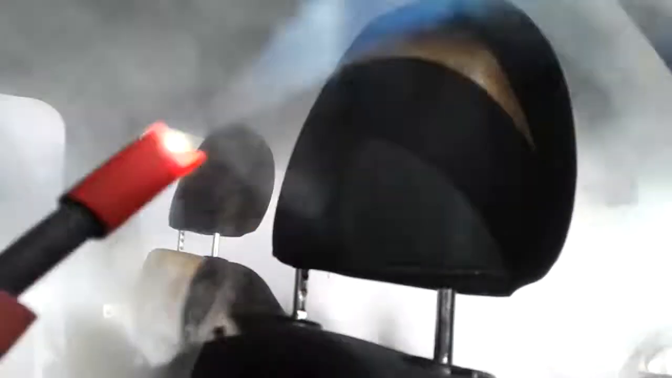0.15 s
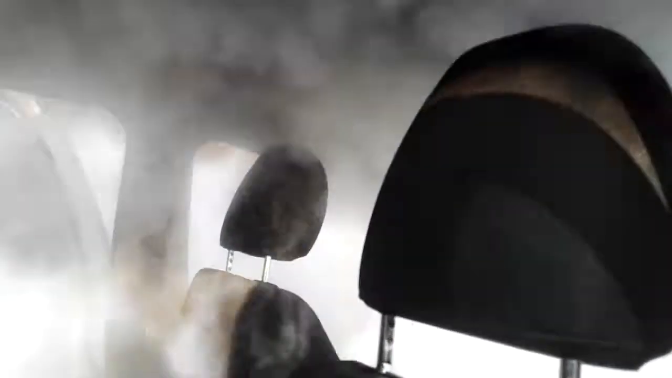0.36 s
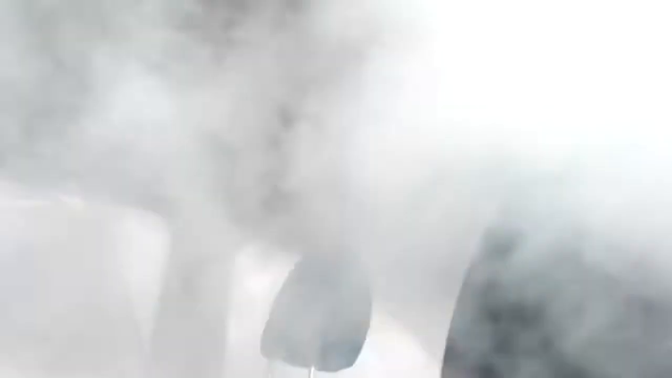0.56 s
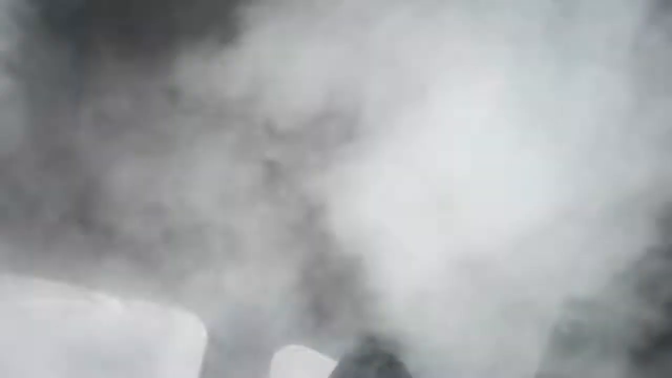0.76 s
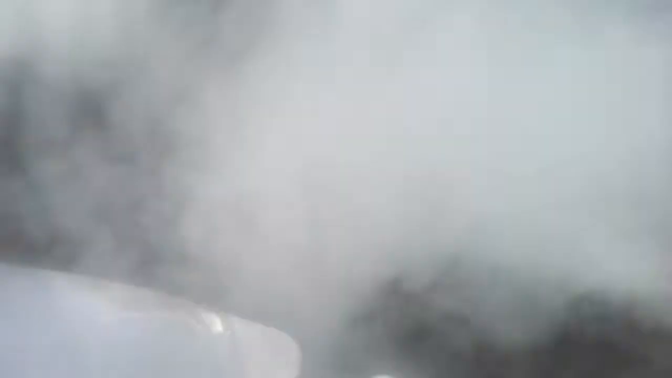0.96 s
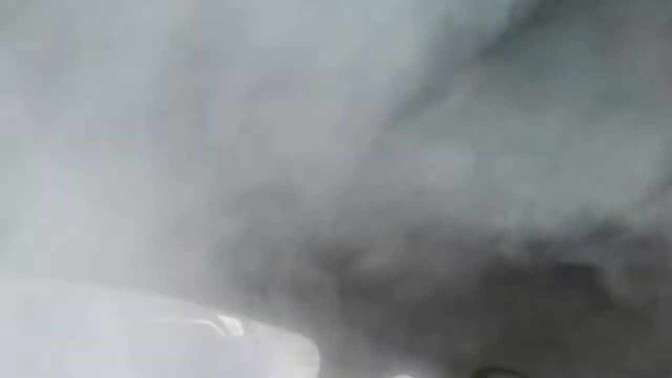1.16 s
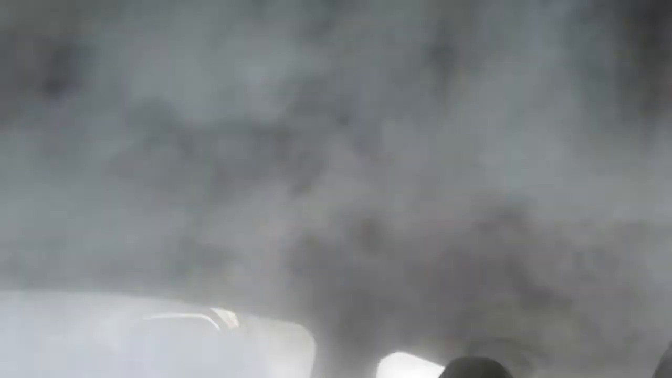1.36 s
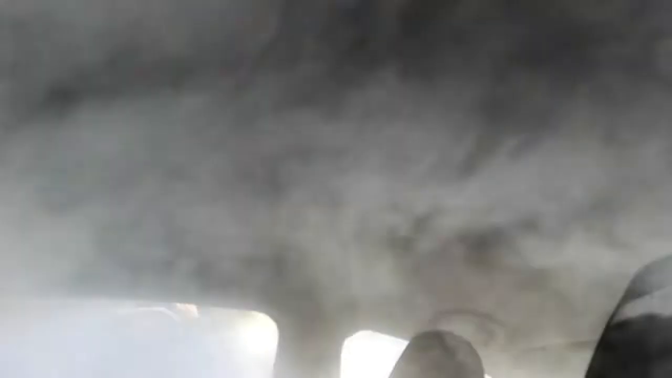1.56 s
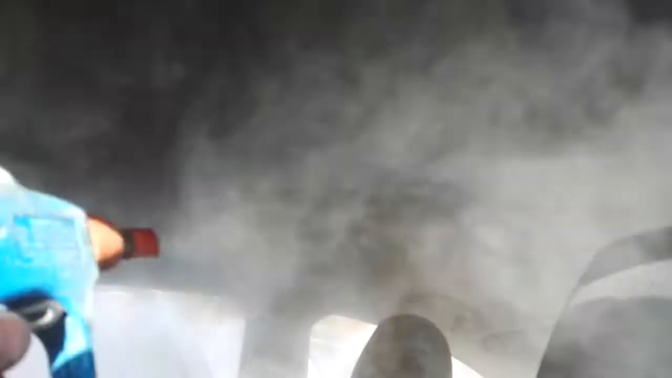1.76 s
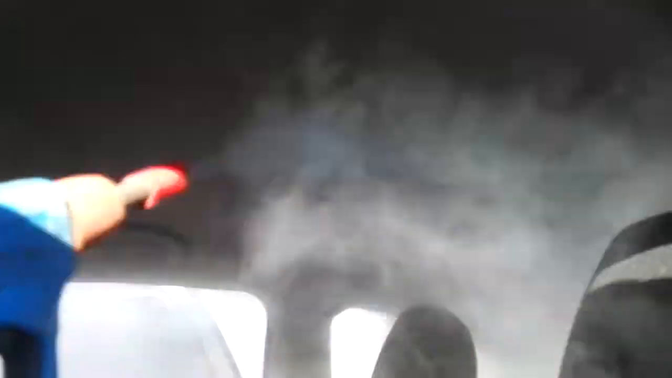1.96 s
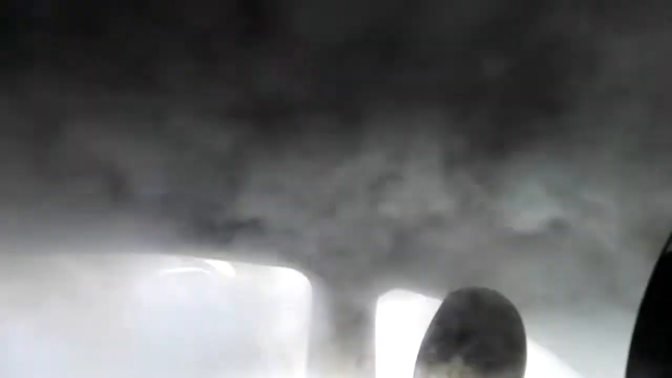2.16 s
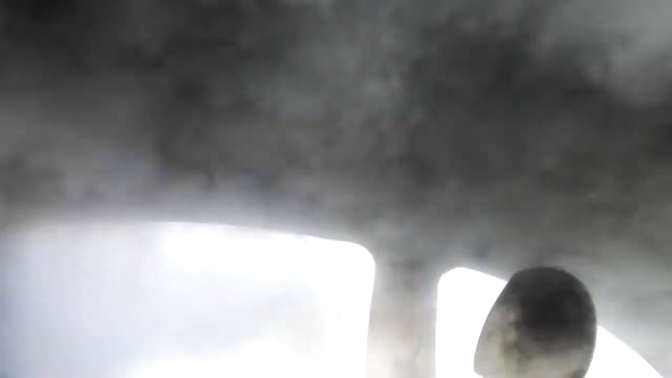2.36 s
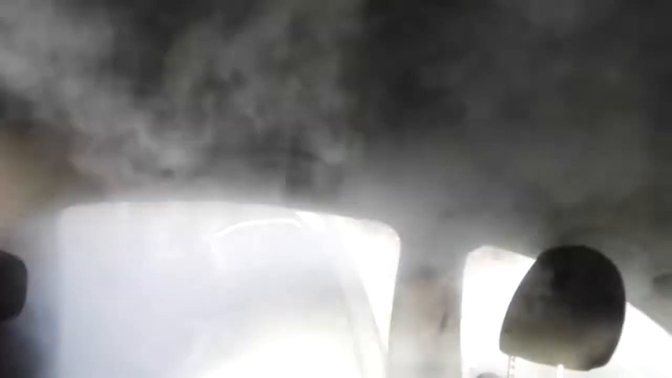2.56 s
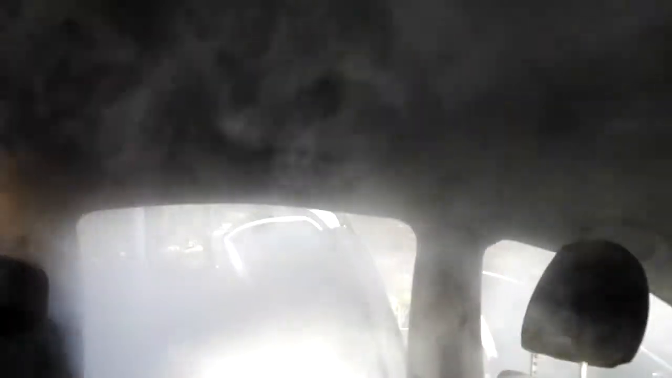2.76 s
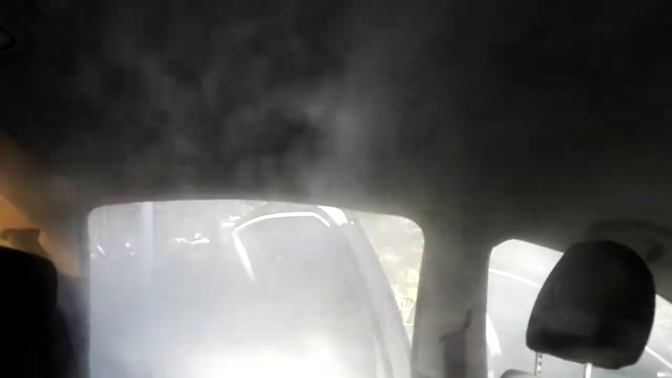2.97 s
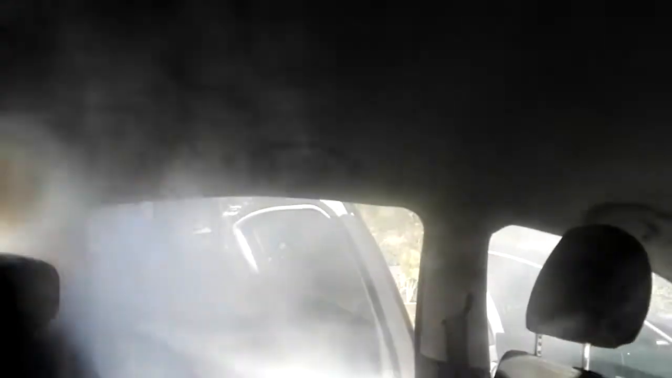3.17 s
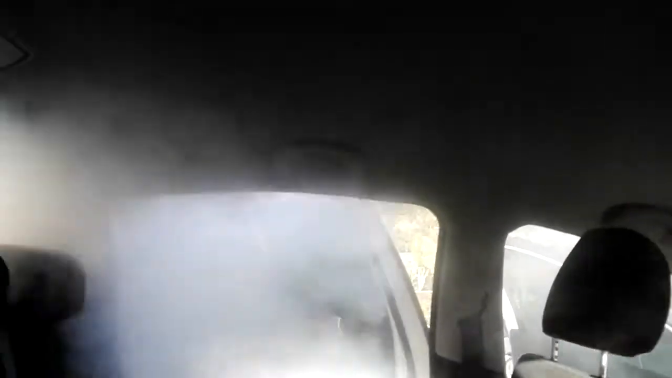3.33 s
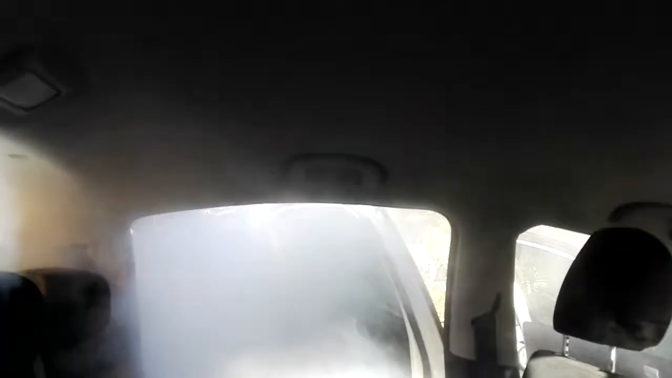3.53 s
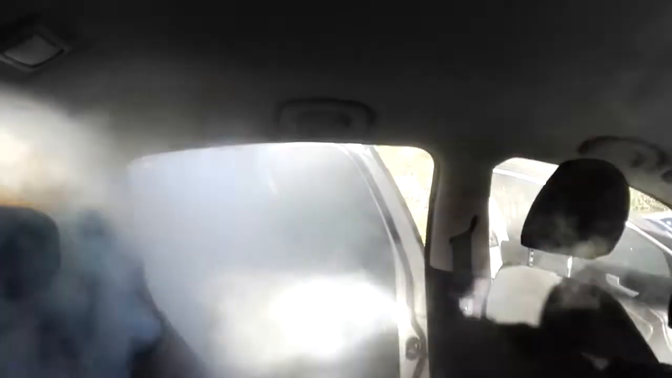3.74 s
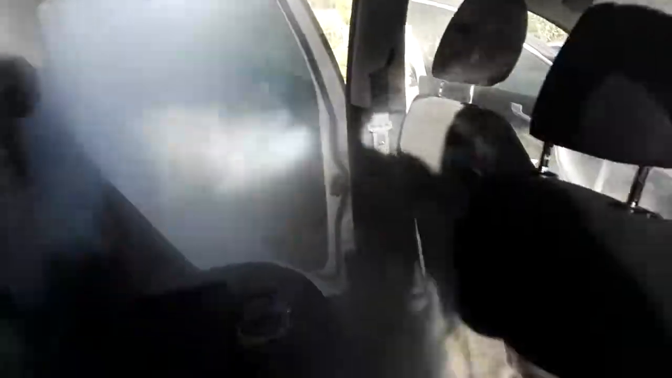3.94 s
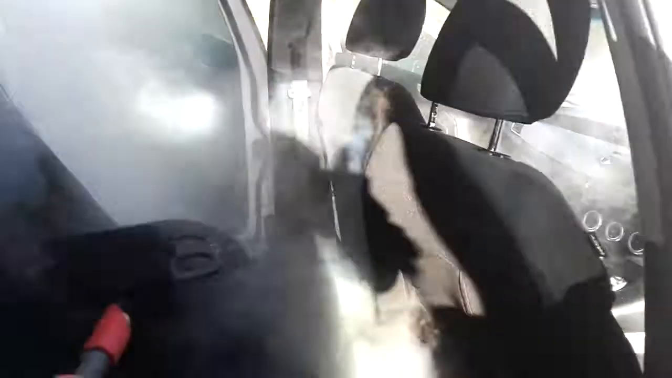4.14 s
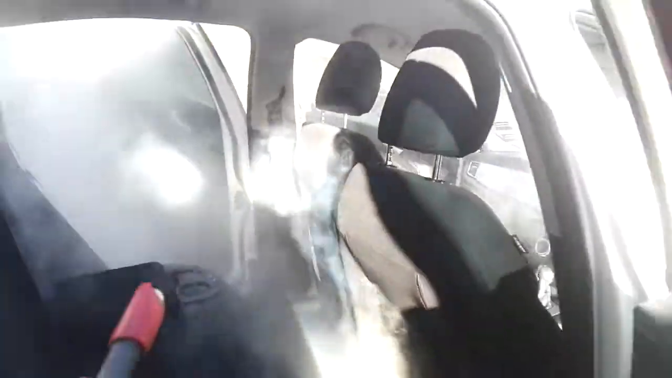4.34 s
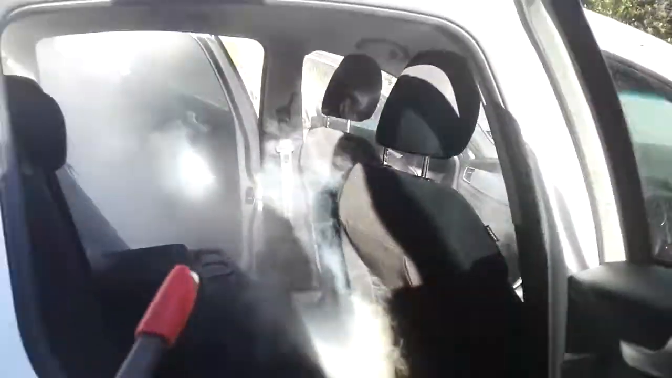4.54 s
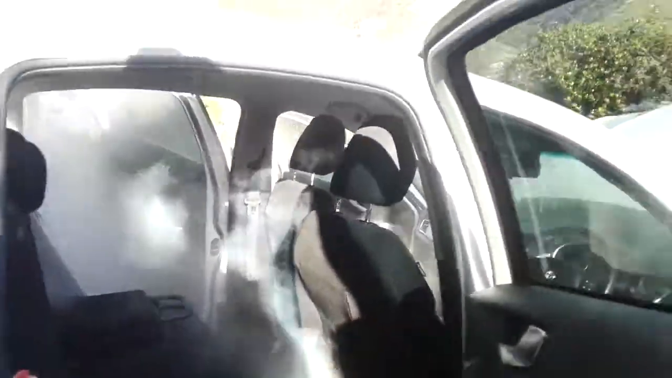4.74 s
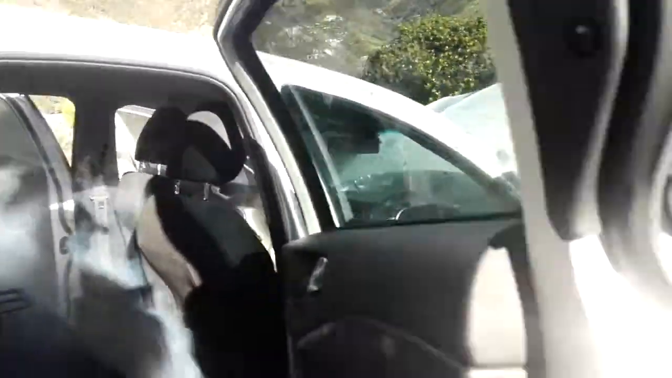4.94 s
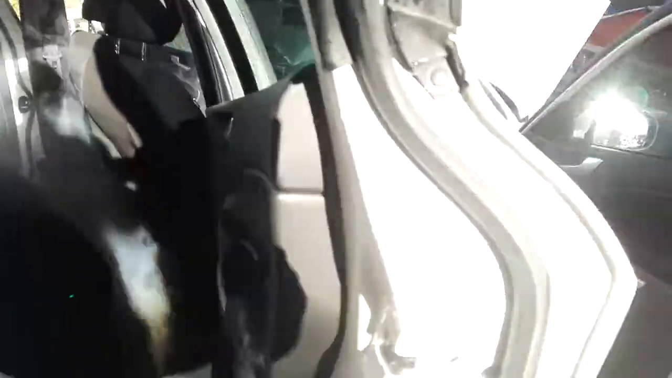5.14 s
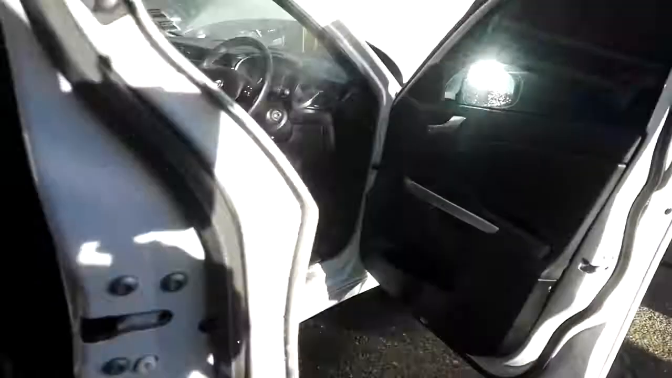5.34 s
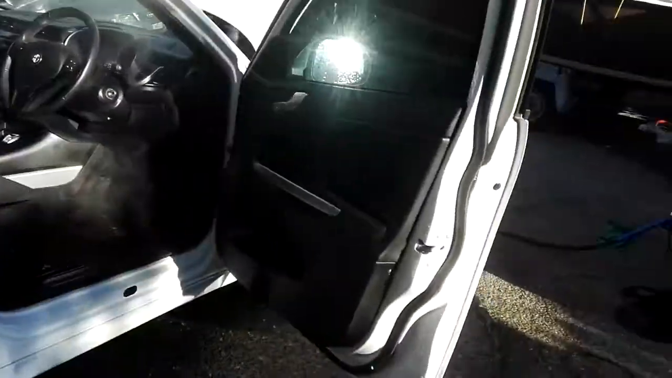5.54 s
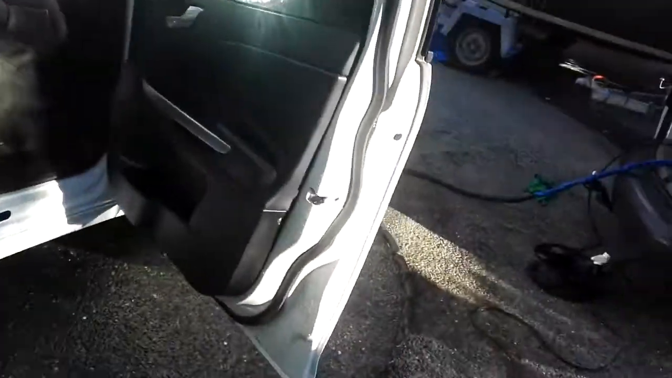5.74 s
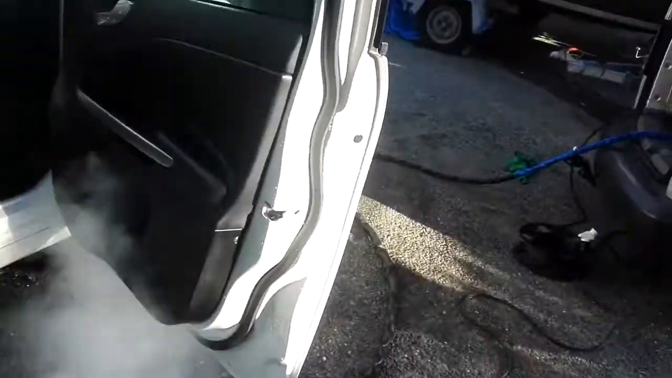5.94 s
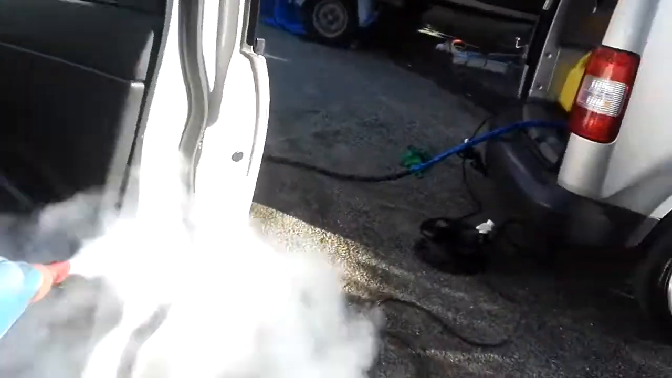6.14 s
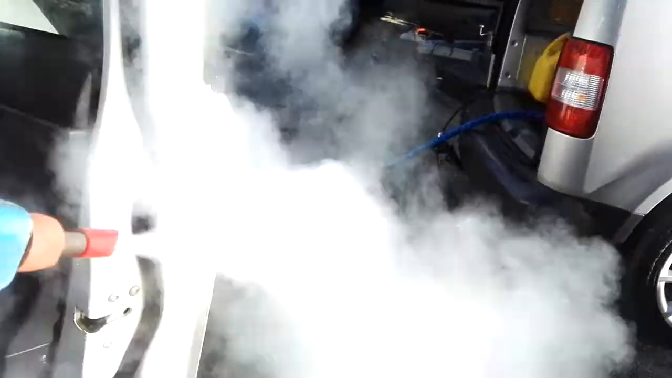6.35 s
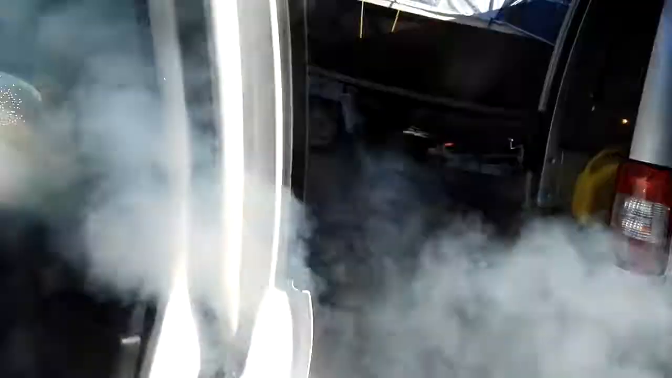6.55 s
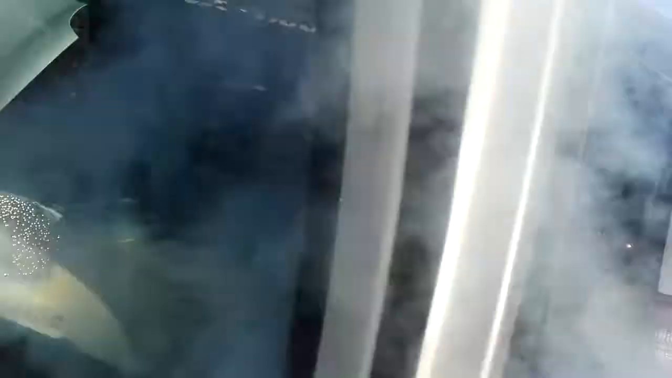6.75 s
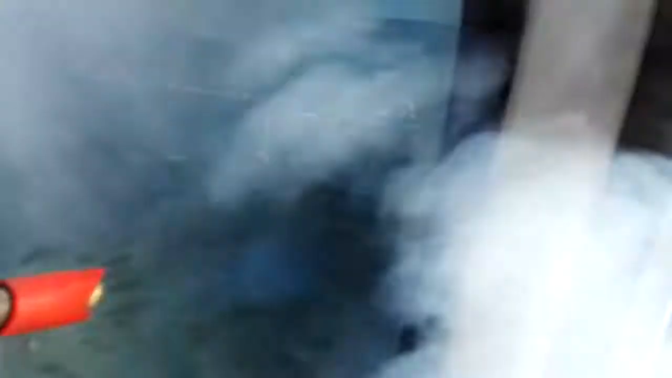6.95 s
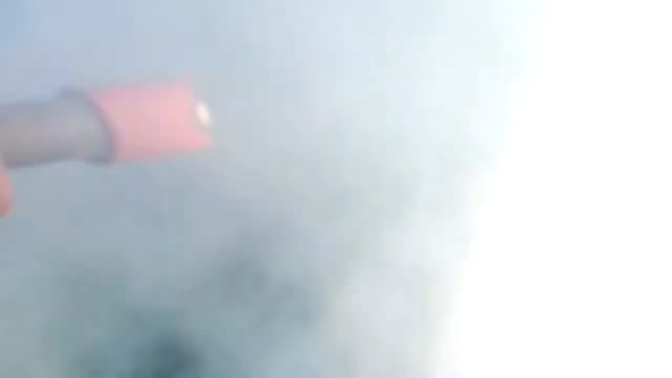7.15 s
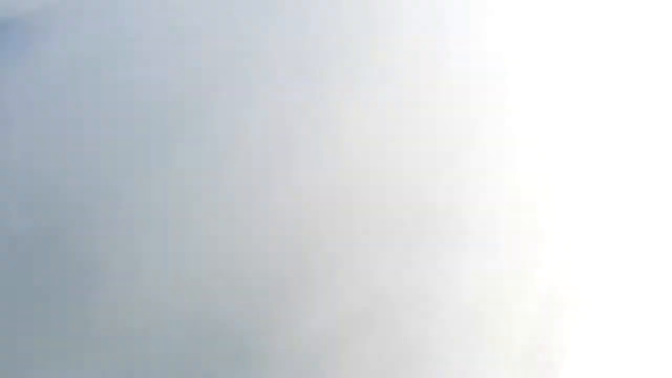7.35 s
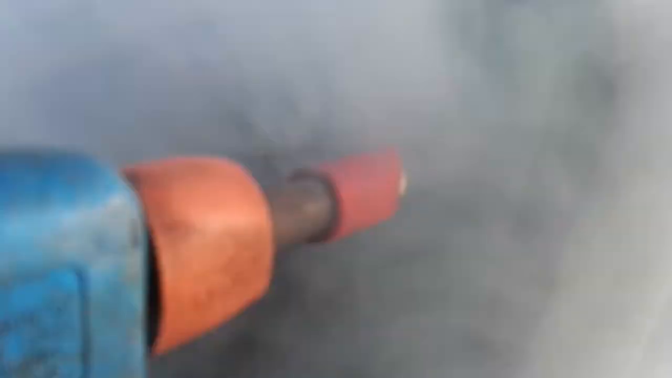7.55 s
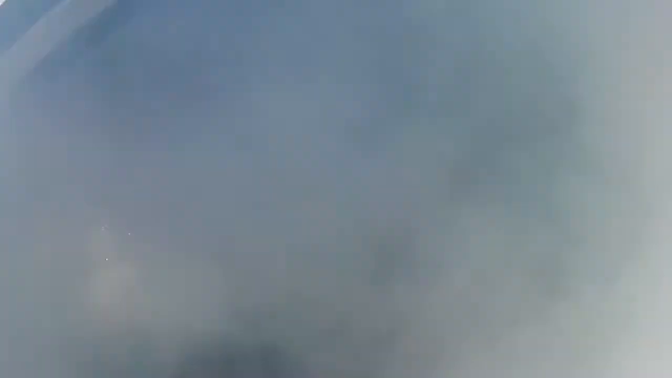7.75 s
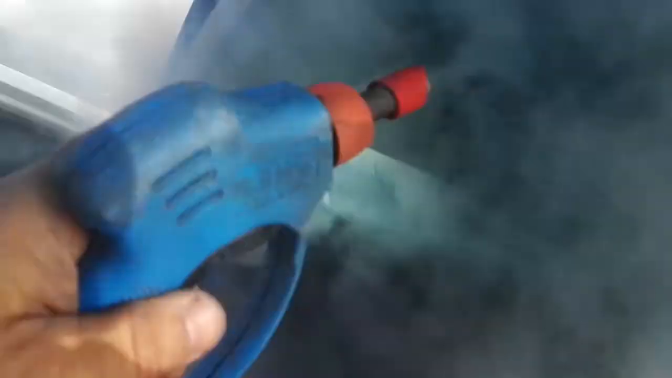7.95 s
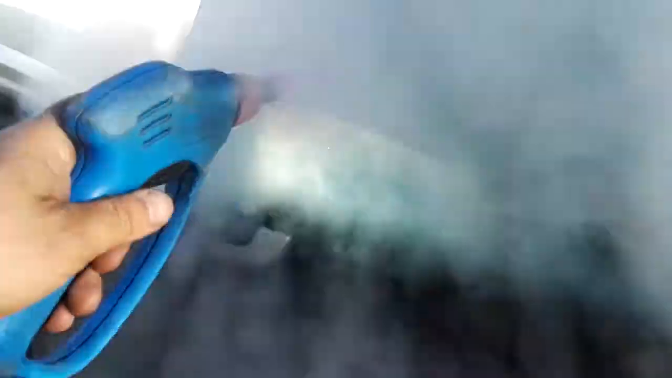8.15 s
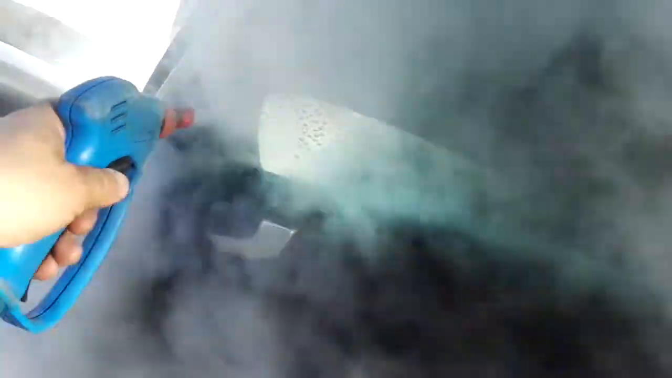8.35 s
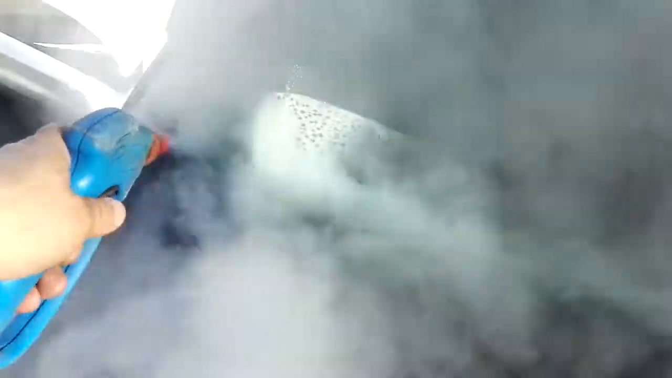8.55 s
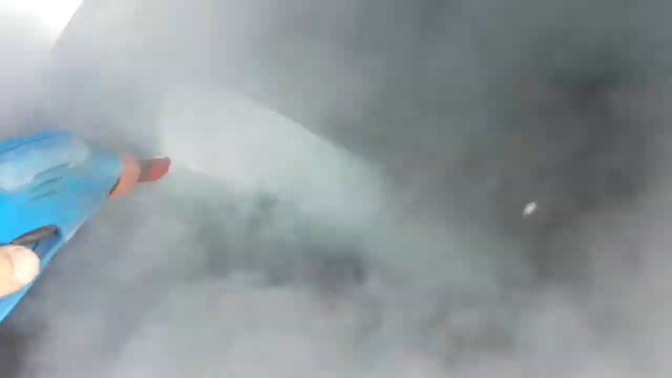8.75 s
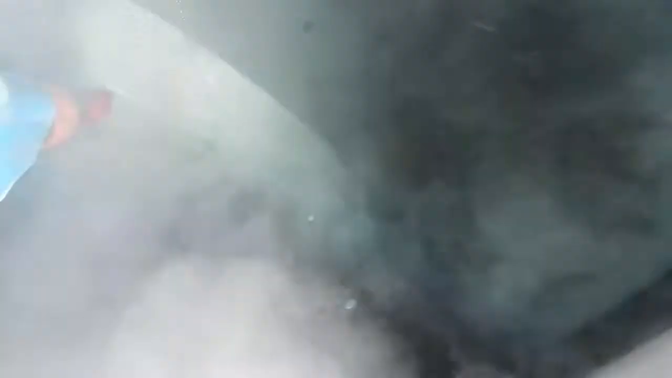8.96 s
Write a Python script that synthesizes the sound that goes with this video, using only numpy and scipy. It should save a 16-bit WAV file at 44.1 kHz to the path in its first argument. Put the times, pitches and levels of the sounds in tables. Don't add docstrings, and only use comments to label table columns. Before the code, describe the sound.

Very close in a car cabin, a steam jet roars and hisses, overloading the microphone at first, then thinning to steadier bright hiss. It cuts off suddenly; a trigger tick, a few bouncing plastic knocks, dull thumps and faint simmering follow over low breeze. A second long jet bursts in and roars to the end.

```python
import sys
import numpy as np
from scipy import signal
from scipy.fft import rfft, irfft, next_fast_len
from scipy.io import wavfile
from scipy.ndimage import uniform_filter1d, map_coordinates

SR = 44100
rng = np.random.default_rng(int(sys.argv[2]) if len(sys.argv) > 2 else 0)


def amplitude_ratio(level_db):
    exponent = np.asarray(level_db, float) / 20
    return 10 ** exponent


def transcribe(u):
    v = np.clip(np.atleast_2d(u).T, -1, 1)
    q = np.round(v * 32767).astype(np.int16)
    wavfile.write(sys.argv[1], SR, q)


N = 401310
SLOW = np.arange(0, N, 64) / SR
SHUTS = 3.8

# pitch_hz [Hz], level_db [dB]
SHADE = [(60, 0), (200, -.8), (600, -6), (1500, -11), (4000, -13)]


def unit(x):
    return x / np.sqrt(np.mean(x ** 2) + 1e-20)


def along(points, hz):
    f, v = np.transpose(points)
    return np.interp(np.log(hz + 1), np.log(f + 1), v)


def curves(rows):
    s, *columns = np.transpose(rows)
    return [np.interp(SLOW, s, column) for column in columns]


def fine(*controls):
    return [np.interp(np.arange(N) / SR, SLOW, control) for control in controls]


def wobble(rate):
    knots = rng.standard_normal(int(N * rate / SR) + 4)
    return map_coordinates(knots, [np.arange(N) * rate / SR])


def filtered(x, response):
    m = next_fast_len(N + 8192)
    return irfft(rfft(x, m) * response(np.fft.rfftfreq(m, 1 / SR)), m)[..., :N]


def colour(spectrum):
    below = (spectrum[0][0] / 4, -90)
    above = (spectrum[-1][0] * 4, -90)
    points = [below] + list(spectrum) + [above]
    return lambda hz: amplitude_ratio(along(points, hz))


def summed(*db):
    return 10 * np.log10(sum(amplitude_ratio(2 * d) for d in db))


def swells(rows, rest_db=-120):
    comes, goes = 230, 200
    start, length, db = np.transpose(rows)[..., None]
    early = np.maximum(start - SLOW, 0)
    late = np.maximum(SLOW - start - length, 0)
    return summed(*(db - comes * early - goes * late), rest_db)


def eddies(patchy_db):
    z = signal.stft(rng.standard_normal((2, N)), nperseg=512)[2]
    field = uniform_filter1d(rng.standard_normal(z.shape), 6, 1)
    field = uniform_filter1d(field, 8, 2)
    return unit(signal.istft(z * amplitude_ratio(patchy_db * unit(field)), nperseg=512)[1][:, :N])


def near_mono(spectrum):
    middle_and_side = unit(filtered(rng.standard_normal((2, N)), colour(spectrum)))
    return np.array([[1, .25], [1, -.25]]) @ middle_and_side


def surroundings():
    # pitch_hz [Hz], level_db [dB per Hz]
    breeze_colour = [(20, -16), (50, -3), (85, 0), (115, -7), (200, -22), (500, -40)]
    drone_colour = [(200, -25), (290, -4.5), (330, -0.5), (380, -12), (520, -22)]
    yard_colour = [(400, -8), (650, -5), (870, 0), (1200, -3.5), (1700, -9), (2500, -7), (3200, -14.5)]
    # pitch_hz [Hz], level_db [dB per Hz]
    simmer_colours = [
        [(2800, -13), (4500, -4), (5500, 1), (8000, -7.5), (11000, -18), (14500, -20)],
        [(2800, -10.5), (5000, 1), (7000, -5), (9500, -0.5), (11500, -3.5), (14500, -5.5)],
    ]
    # start_s [s], length_s [s], level_db [dB]
    breeze_on = [(3.8, 1.13, -64.5), (3.8, 0.46, -72), (4.97, .2, -70), (5.17, 0.12, -63)]
    drone_on = [(4.36, .1, -79), (4.6, .4, -86), (5.02, 0.447, -80.5), (5.5, .36, -83)]
    yard_on = [(4.33, 1.11, -81.5), (4.52, 0.11, -82), (4.9, .3, -80.5)]
    simmer_on = [(4.385, 1.03, -67.5), (4.68, .05, -71), (4.95, .3, -69.5)]

    breeze_db, drone_db = fine(swells(breeze_on, rest_db=-89), swells(drone_on, rest_db=-90))
    yard_db, simmer_db = fine(swells(yard_on, rest_db=-91.5), swells(simmer_on, rest_db=-83))
    breeze = amplitude_ratio(breeze_db + 4.6 + 2.6 * wobble(17)) * near_mono(breeze_colour)
    drone = amplitude_ratio(drone_db + 3.5) * near_mono(drone_colour)
    yard = amplitude_ratio(yard_db + 6.0) * unit(filtered(eddies(patchy_db=2.0), colour(yard_colour)))
    simmer = [unit(filtered(e, colour(s))) for e, s in zip(eddies(patchy_db=3.0), simmer_colours)]
    simmer = amplitude_ratio(simmer_db + [[1.5], [4.2]]) * simmer
    return breeze + drone + yard + simmer


def handling():
    # start_s [s], peak_db [dB], click_db [dB]
    knocks = [
        (4.245, -35, -25.5),
        (4.313, -41, -28),
        (4.376, -45, -33),
        (4.436, -46, -33),
    ]
    # pitch_hz [Hz], level_db [dB], t60_s [s to fade by 60 dB]
    gun_rings = [(189.4, 2, 0.11), (321, -12, .06), (470, -13, 0.066), (730, -28.5, .05),
                 (1030, -23, 0.058)]
    # start_s [s], peak_db [dB], pitch_hz [Hz]
    thumps = [(4.559, -46, 99.6), (4.664, -47, 80.7), (4.719, -48, 108), (4.779, -52, 218),
              (4.805, -44, 166), (4.855, -50, 99.6), (5.269, -60, 80.7)]
    # start_s [s], peak_db [dB]
    ticks = [
        (3.866, -49),
        (3.891, -60.5),
    ]

    out, t = np.zeros(N), np.arange(SR // 5) / SR
    soft = 1 - np.exp(-t / 0.0023)
    dull = signal.butter(8, 5100, fs=SR)
    for s, db, click_db in knocks:
        ring = 0
        for hz, level, t60 in gun_rings:
            fade = amplitude_ratio(level + rng.normal(0, 1.7) - 60 * t / t60)
            ring = ring + fade * np.sin(2 * np.pi * hz * t)
        click = signal.lfilter(*dull, rng.standard_normal(len(t)))
        click = amplitude_ratio(click_db + 13 - 60 * t / 0.018) * click
        out[round(s * SR):][:len(t)] += amplitude_ratio(db - 3.0) * (soft * ring + click)
    for s, db, hz in thumps:
        push = np.sin(2 * np.pi * hz * t) + 0.3 * np.sin(2 * np.pi * 2.03 * hz * t)
        out[round(s * SR):][:len(t)] += amplitude_ratio(db + 4.0 - 60 * t / 0.058) * soft * push
    for s, db in ticks:
        tick = np.sin(2 * np.pi * 1050 * t) + .5 * np.sin(2 * np.pi * 2100 * t)
        out[round(s * SR):][:len(t)] += amplitude_ratio(db - 60 * t / 0.024) * tick
    return out


def cabin(x):
    # pitch_hz [Hz], t60_s [s to fade by 60 dB]
    fading = [(300, 0.204), (4000, 0.4), (14000, .25)]
    hz, t, z = signal.stft(rng.standard_normal((2, SR // 2)), SR, nperseg=256)
    tail = signal.istft(z * amplitude_ratio(-60 * t / along(fading, hz)[:, None]), SR, nperseg=256)[1]
    return signal.fftconvolve(x, tail / np.linalg.norm(tail[0]), axes=1)[:, :N]


def round_body(right, other):
    # pitch_hz [Hz], delay_ms [ms]
    lag = [(100, 0.79), (600, 0.81), (2000, .6), (6000, .55)]
    # pitch_hz [Hz], likeness [0 to 1]
    likeness = [(100, 0.94), (600, 0.91), (1800, .7), (4000, .2), (8000, .05)]

    def alike(hz):
        return np.clip(along(likeness, hz), 0, 1)

    def late(hz):
        return alike(hz) * np.exp(-2j * np.pi * hz * along(lag, hz) / 1000)

    def scattered(hz):
        return np.sqrt(1 - alike(hz) ** 2)

    heard = filtered(right, late) + filtered(other, scattered)
    return filtered(heard, lambda hz: amplitude_ratio(along(SHADE, hz)))


def spits(channels):
    per_second, peak_db, pulse_s = 250, 9, .00007
    chance = rng.random((channels, N)) * SR / per_second
    size = -np.log(np.clip(chance, 1e-9, 1))
    u = np.arange(SR // 800) / (pulse_s * SR)
    pop = amplitude_ratio(peak_db) * (1 - u / 2) * np.exp(-u / 2)
    return signal.lfilter(pop, [1], size)


def aim():
    # start_s [s], nozzle_db at the right port [dB], left_db left port re right [dB],
    # splash_db on seats and glass re the nozzle [dB]
    gun_held = [(0.0, -9, -10, -9), (1.2, -13.5, -10, -9), (1.4, -18.5, -7.5, -17.5), (1.62, -21, -5, -25),
                (2.1, -18, -7.5, -15), (2.5, -20, -9, -15), (3.0, -20.5, -8.5, -17),
                (3.42, -19.5, -9.5, -21.5), (3.8, -19, -5, -11), (5.88, -15, -4, -22.5),
                (6.2, -15, -6.5, -16), (6.42, -17, -6, -19), (6.6, -16, -7.5, -31), (7.3, -8, -10.5, -16.5),
                (7.87, -14.5, -8, -13.5), (8.2, -16, -2.5, -25), (8.56, -16, -6, -12.0),
                (9.1, -13.5, -2, -3.5)]
    # start_s [s], length_s [s], level_db [dB]
    sweeps_left = [(0, .235, -15.5), (.3, .08, -21.5), (6.655, 0.017, -26), (6.95, 0.027, -18.5),
                   (7.02, .02, -22), (7.135, 0.12, -13), (7.31, .04, -18.5), (7.48, .04, -21.5),
                   (7.53, .17, -15.5), (7.995, .115, -16), (8.26, .36, -35), (8.715, .045, -21.5),
                   (9.01, 0.034, -31)]
    sweeps_right = [(0, 1.14, -16), (1.19, .03, -25), (2.207, .01, -35), (2.355, .01, -40),
                    (3.112, .2, -40), (3.56, .09, -38), (3.77, .006, -28), (3.792, 0.0035, -33),
                    (5.95, .006, -30.5), (6.086, .105, -31.5), (6.276, 0.029, -25.5), (6.508, 0.014, -23),
                    (6.555, .005, -26), (6.642, 0.0095, -18), (6.675, 0.056, -19), (6.773, .097, -23),
                    (6.89, .83, -15), (7.988, 0.12, -13), (8.15, 0.017, -19.5), (8.274, .037, -25),
                    (8.33, .1, -23), (8.688, 0.12, -15.5), (8.96, .05, -22.5), (9.03, .1, -18)]
    # start_s [s], length_s [s], gain_db [dB]
    turns = [
        (1.87, .19, 4),
        (3.08, 0.28, 5),
        (3.602, .06, 1.5),
    ]
    fizz_db = [0.5, -2.5, -15]
    surge_s, surge_db = .021, 8.5
    sweep_db = 8.5

    nozzle, under, splash = curves(gun_held)
    left, right = swells(sweeps_left) + sweep_db, swells(sweeps_right) + sweep_db
    extra = [(s, length, 10 * np.log10(amplitude_ratio(2 * abs(db)) - .99)) for s, length, db in turns]
    turned = summed(0, swells(extra))
    surge = surge_db * np.exp(-((SLOW - SHUTS + surge_s) / surge_s) ** 2)
    steady = nozzle + 1.5 + surge
    hiss = summed(steady, right + fizz_db[1])
    hiss_left = summed(steady + under + turned, left + fizz_db[0], right + fizz_db[2])
    roar = summed(nozzle + splash + 6, right)
    roar_left = summed(roar - 12 + turned, left)
    rumble = summed(roar, roar_left) - 21
    return fine(hiss, hiss_left - hiss, roar, roar_left - roar, rumble)


def nozzle_hiss(hiss_db, hiss_pan, sputter):
    # pitch_hz [Hz], level_db [dB per Hz]
    hiss_colours = [
        [(1200, -22), (2500, -9), (4000, -3.5), (6500, -1), (9000, -3), (12000, -5.5), (14500, -4.5)],
        [(1200, -27.5), (2500, -14.5), (4000, -9), (6500, -3.5), (9000, -1), (12000, -0.5), (14500, -2.5)],
    ]
    left, right = (unit(filtered(e, colour(s))) for e, s in zip(eddies(patchy_db=1.18), hiss_colours))
    right = right + .1 * (right ** 2 - 1)
    return amplitude_ratio(hiss_db + sputter) * np.array([amplitude_ratio(hiss_pan) * left, right])


def plume_roar(roar_db, roar_pan, rumble_db, sputter):
    # pitch_hz [Hz], level_db [dB per Hz]
    roar_colour = [(20, -10.5), (60, -6.5), (250, -2), (600, -2), (1200, 0), (2500, 0.5), (4500, -0.5),
                   (8000, -6), (14500, -24.5)]
    plume, scatter = unit(filtered(eddies(patchy_db=1.1), colour(roar_colour)))
    plume = plume + spits(channels=1)[0]
    plume = np.array([round_body(plume, scatter), plume])
    buffet = unit(filtered(eddies(patchy_db=1.9), colour(roar_colour))) + spits(channels=2)

    shaded = amplitude_ratio(2 * along(SHADE, 1500))
    swept = np.clip((amplitude_ratio(2 * roar_pan) - shaded) / (1 - shaded), 0, 1.5)
    mix = np.sqrt(np.clip(1 - swept, 0, 1)) * plume
    mix = mix + np.sqrt([swept, np.minimum(swept, 1)]) * buffet

    ragged_db = 1.9
    edge = np.clip((-6 - roar_db) / 6, .15, 1)
    ragged = ragged_db * edge * (wobble(60) + wobble(190) - .25 * ragged_db)

    def bass(hz):
        return 1 / (1 + (hz / 320) ** 2)

    rumble = amplitude_ratio(rumble_db + 1.5 * wobble(9) + sputter) * unit(filtered(plume, bass))
    return rumble + amplitude_ratio(roar_db + sputter + ragged) * filtered(mix, lambda hz: 1 - bass(hz))


def jet():
    # pitch_hz [Hz], level_db [dB per Hz]
    seep_colour = [(3600, -42), (4500, 0), (5300, -20)]
    opens, rise = 5.858, 0.025
    drain = 0.036

    hiss_db, hiss_pan, roar_db, roar_pan, rumble_db = aim()
    sputter = .5 * wobble(18) + 0.37 * wobble(45)
    steam = nozzle_hiss(hiss_db, hiss_pan, sputter)
    steam = steam + plume_roar(roar_db, roar_pan, rumble_db, sputter)

    t = np.arange(N) / SR
    closing = amplitude_ratio(-60 * np.clip(t - SHUTS, 0, 1) / drain)
    opening = np.clip((t - opens) / rise, 0, 1) ** 1.6
    seep = unit(filtered(eddies(patchy_db=2.0), colour(seep_colour)))
    seep = amplitude_ratio(-84) * np.clip((t - opens + .16) / .08, 0, 1) * seep
    return (closing + opening) * steam + seep


def scene():
    steam = jet()
    return steam + amplitude_ratio(-25) * cabin(steam) + surroundings() + handling()


def band_limit(x):
    return signal.sosfilt(signal.butter(12, 14330, fs=SR, output="sos"), x)


def record(dry):
    top, hard = 1.1, 6
    clipped = dry / (1 + np.abs(dry / top) ** hard) ** (1 / hard)
    return band_limit(clipped)


dry = scene()
out = record(dry)
transcribe(out)
```